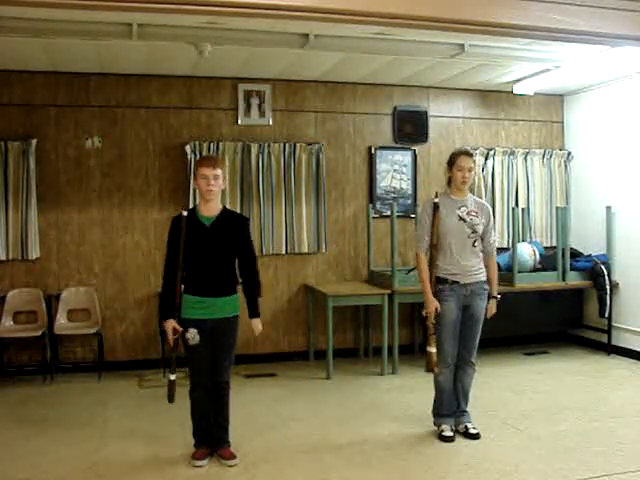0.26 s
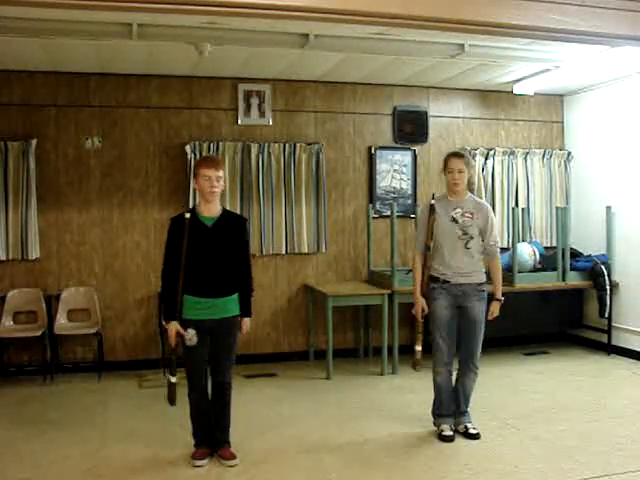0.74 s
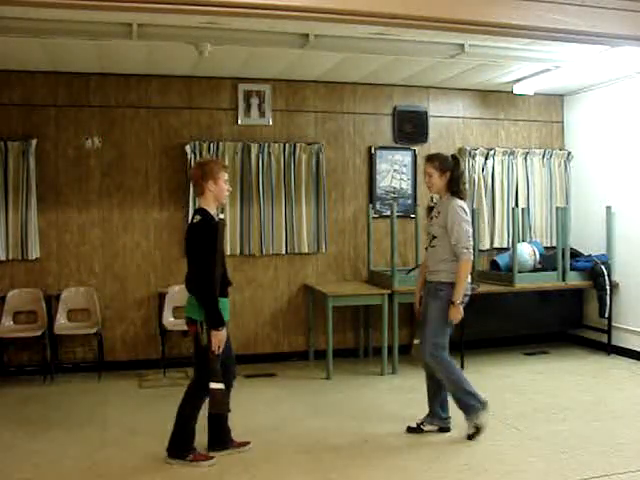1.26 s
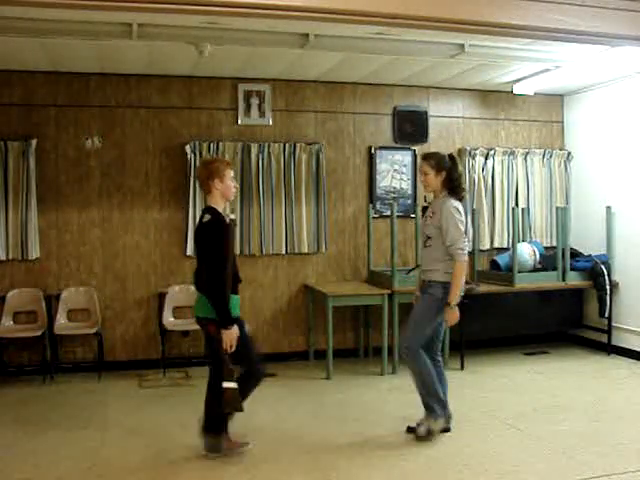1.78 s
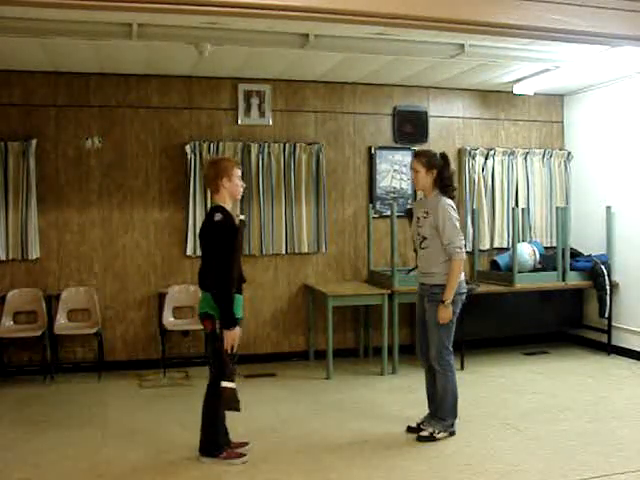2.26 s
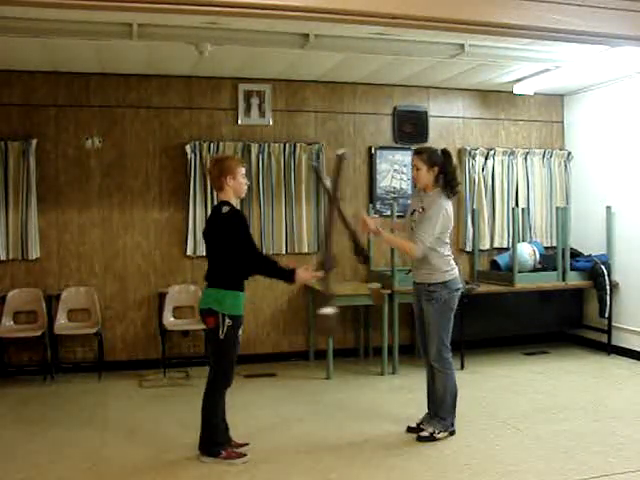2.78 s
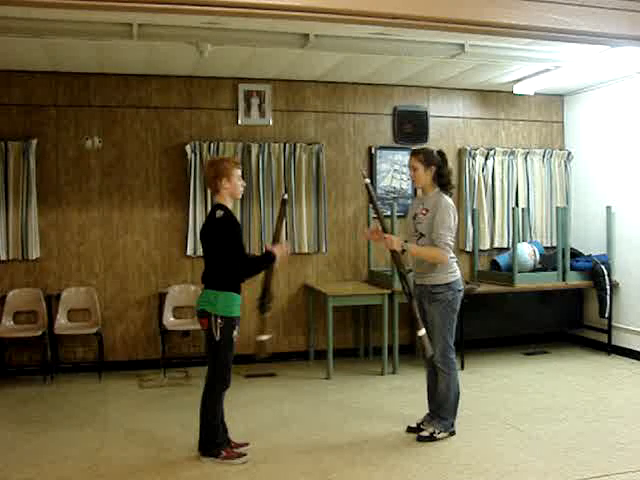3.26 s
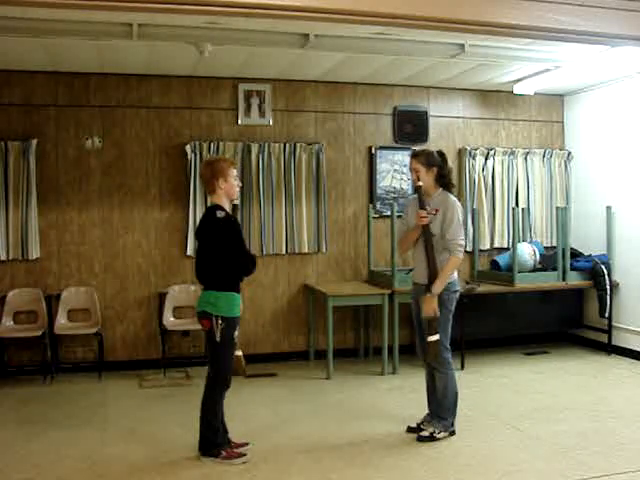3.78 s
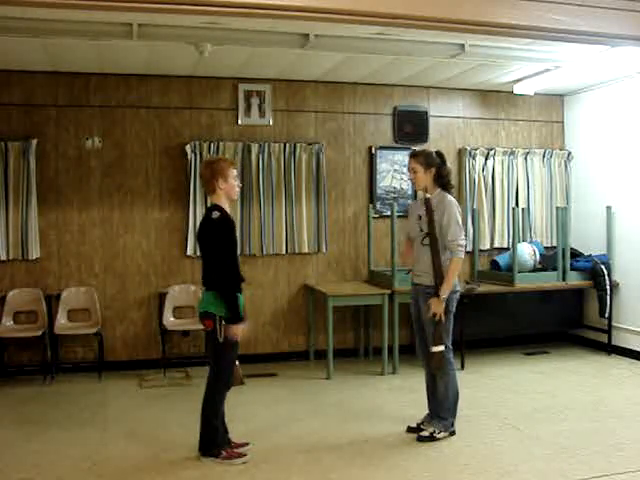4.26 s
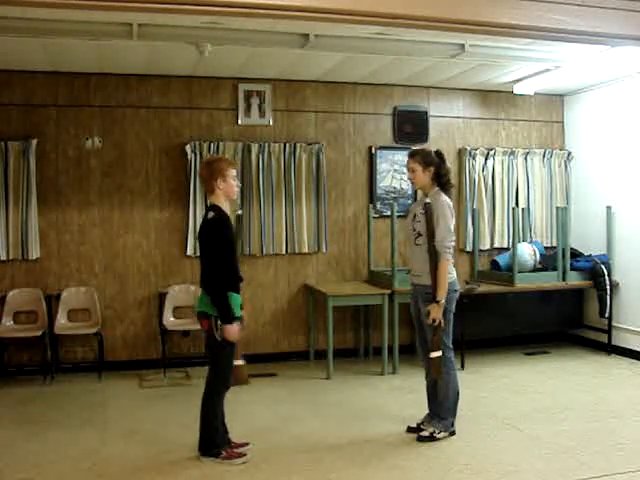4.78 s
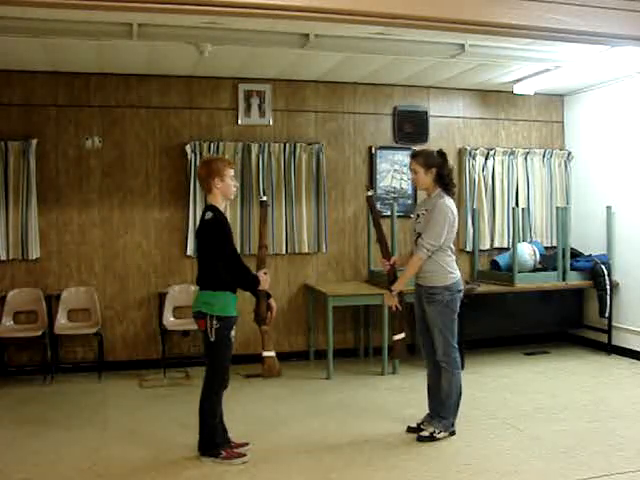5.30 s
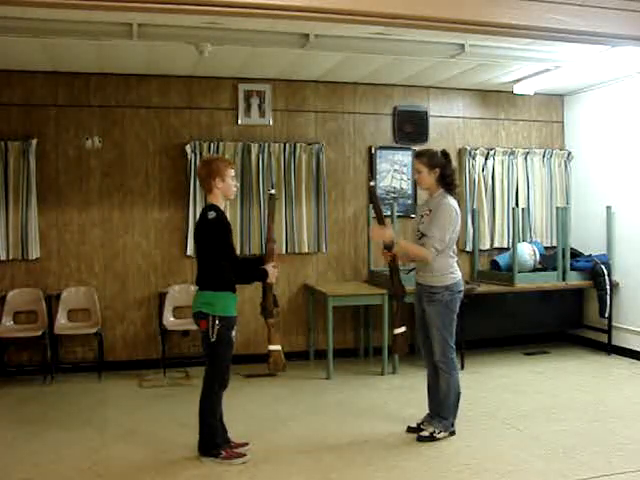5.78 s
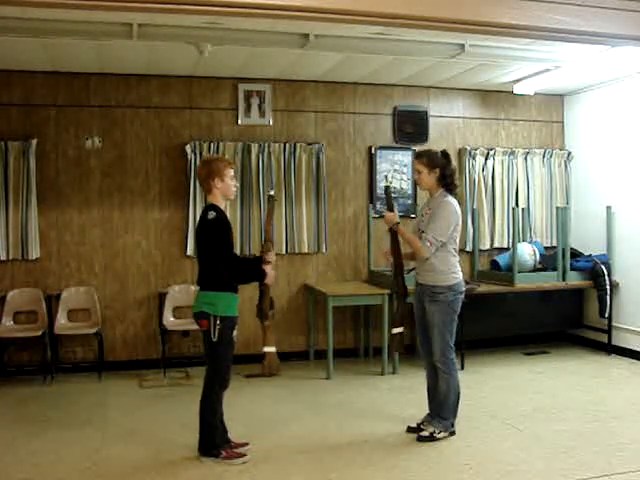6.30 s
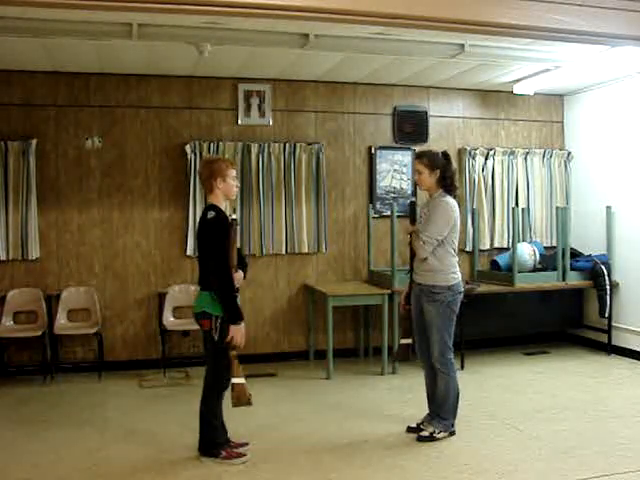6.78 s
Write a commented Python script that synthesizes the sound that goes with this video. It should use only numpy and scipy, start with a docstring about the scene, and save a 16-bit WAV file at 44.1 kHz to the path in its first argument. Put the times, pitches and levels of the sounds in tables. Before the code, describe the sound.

Echoing hall rifle drill: light taps, squeaky turn and scuff, metallic clink, loud foot stamp, then irregular bursts of crisp woody slaps with pauses.

```python
"""A panelled hall with a hard floor, where two people drill with wooden-stocked rifles.
Hands slap the stocks: coloured clicks, wood modes and cupped-air pops. Steel fittings tick and ring.
Soles squeak as wavering tones, scuff as grainy noise and stamp with a thud, floor modes and a boom.
The blows reach the microphone with a reverberant tail of most of a second, over steady room noise.
A small camera's gain control flattens the loudest blows and leaks a soft thump."""
import sys
import numpy as np
from scipy import signal
from scipy.fft import rfft, irfft
from scipy.io import wavfile

SR = 44100
rng = np.random.default_rng(int(sys.argv[2]) if len(sys.argv) > 2 else 0)


def materialize(psi):
    """Save the field psi as 16-bit PCM at rate SR to the path in sys.argv[1].

    A 1-D psi becomes a single channel; in a 2-D psi each row is a channel.
    """
    bounded = np.clip(np.atleast_2d(psi).T, -1, 1)
    quanta = np.round(bounded * 32767).astype(np.int16)
    wavfile.write(sys.argv[1], SR, quanta)


N = 310464

# hands on the rifles: start_s, level_db, pop_db (re crack), treble_db, knock_hz (where the hand lands)
SLAPS = [(0.003, -7.5, -1, -12, 3200), (0.045, -5.5, 0, -23, 1450), (0.241, 2.5, -1, -18.5, 1610),
         (0.363, -12, -10, 7, 3700), (0.851, -9, 2, -16, 1290), (1.3, -4.5, 2, 25, 1320),
         (2.497, -5.5, -6, -14, 2540), (2.716, 3.5, -8, -11, 1600), (2.929, 14, -21, -1.5, 2900),
         (3.022, 17, -3.5, 2.5, 3010), (3.389, 6.5, -12, -6.5, 2450), (3.495, 9, -5.5, -1, 2160),
         (3.779, -3.5, 12, -24, 1330), (3.812, 4, 4, -5.5, 2700), (4.168, -5.5, 2.5, -3, 2820),
         (4.366, -1, -1, -19.5, 1660), (4.848, -6, -8, -5, 3080), (5.08, 20.5, -15, 0, 1840),
         (5.191, 5, -7, -28, 1790), (5.87, 17, -7, 4.5, 1800), (5.954, 10.5, -12, -6, 2530),
         (6.422, -8, -5, -10, 1770), (6.516, -10.5, -0.5, 15, 2280), (6.638, 17.5, -2.5, 8, 3250),
         (6.692, 15, -10, -14.5, 2310)]
# colour of palm on wood: freq_hz, density_db
CRACK_COLOUR = [(60, -43.5), (150, -30.5), (300, -15.5), (480, -9), (650, -5), (850, 1.5), (1300, 3),
                (1800, 3.5), (2400, 4.5), (3300, 4), (4400, 1.5), (5600, -7), (8000, -9), (10000, -18.5)]
# what the rifles ring with: pitch_hz, level_db, t60_s
STOCK_MODES = [(464, 5.5, 0.043), (1390, -9, 0.043), (1665, 9, 0.21), (2340, -2.5, 0.062), (2770, 5, 0.16),
               (3050, -18.5, 0.24), (3640, -3, 0.079)]
STOCK_DB = -16.5                       # re crack
KNOCK_DB, KNOCK_CYCLES = -7.5, 28      # knock of the wood under the hand: re crack, periods to die by 60 dB
FINGERS_LEAD_S, FINGERS_DB = .002, -15   # the fingers touch just before the palm; level re crack
# rattle time after a 0 dB slap; a harder slap grips the rifle sooner (dB of time per dB)
RATTLE_S, RATTLE_SHORTENS = 0.011, 0.13
# air cupped under a palm: pitch, its fall per dB of pop, time the hand takes to close, periods to die
HOLLOW_HZ, HOLLOW_FALL_HZ_PER_DB, GRIP_S, HOLLOW_CYCLES = 850.5, 3, .009, 32
UNEVEN_DB = 1.8                        # chance peaks in the colour of each blow


def rifle_slaps():
    """A palm cracks on the stock, the rifle knocks, rings and rattles, and the air under the closing hand pops."""
    out = np.zeros(N)
    no_bass = signal.butter(2, 480, "high", fs=SR, output="sos")   # a slim stock radiates little bass
    for start_s, level_db, pop_db, treble_db, knock_hz in SLAPS:
        strength = from_db(level_db)
        rattle_s = RATTLE_S * from_db(-RATTLE_SHORTENS * level_db)
        crack = pulse(CRACK_COLOUR, treble_db=treble_db, uneven_db=UNEVEN_DB)
        knock = from_db(KNOCK_DB) * cavity(knock_hz, KNOCK_CYCLES)
        wood = knock + from_db(STOCK_DB) * ring(STOCK_MODES, detune=0.00075)
        pop = cavity(HOLLOW_HZ - HOLLOW_FALL_HZ_PER_DB * pop_db, HOLLOW_CYCLES)
        add(out, start_s - FINGERS_LEAD_S, strength * from_db(FINGERS_DB) * contact(crack, RATTLE_S))
        add(out, start_s, strength * contact(crack, rattle_s))
        add(out, start_s, strength * contact(signal.sosfilt(no_bass, wood), rattle_s))
        pop_in_hall = contact(signal.sosfilt(no_bass, pop), rattle_s)
        add(out, start_s + GRIP_S, strength * from_db(pop_db) * pop_in_hall)
    return out


# small metal parts: start_s, level_db, ring_db (re tick)
CLINKS = [(1.73, 14.5, -2.5), (1.773, -8, -16), (2.385, -4.5, -20), (2.494, -3.5, -16), (2.763, 0, -18),
          (4.02, -4, -28)]
# colour of a steel tick: freq_hz, density_db
TICK_COLOUR = [(100, -50), (600, -39), (1400, -4.5), (2300, 0.5), (4200, 2.5), (5500, -3), (8000, -4),
               (10000, -10.5)]
# what the fittings ring with: pitch_hz, level_db, t60_s
METAL_MODES = [(3910, -3, .05), (4156, 0, 0.064), (3880, -17, .06), (4540, -0.5, 0.034), (6400, -18, .2),
               (8540, -25, .08)]
CLINK_TREBLE_DB, CLINK_RATTLE_S = -1, 0.0088


def fittings():
    """Small steel parts chatter and ring high."""
    out = np.zeros(N)
    for start_s, level_db, ring_db in CLINKS:
        tick = pulse(TICK_COLOUR, treble_db=CLINK_TREBLE_DB, uneven_db=UNEVEN_DB)
        metal = ring(METAL_MODES, detune=0.00076)
        add(out, start_s, from_db(level_db) * contact(tick, CLINK_RATTLE_S))
        add(out, start_s, from_db(level_db + ring_db) * contact(metal, CLINK_RATTLE_S))
    return out


# feet on the floor: start_s, level_db, thud_db, treble_db, scrape_s
STEPS = [(0.617, -5, -14, 1, 0.0011), (0.66, -15.5, 24, -20, 0.011), (0.741, -6.5, -4, 3.5, 0.013),
         (1.23, -5, 5, 7, 0.0098), (1.41, 5.5, 6.5, -2, 0.03), (1.611, -6, -5, 16, 0.002),
         (1.898, 24, -7.5, -2.5, 0.0092), (1.921, 15.5, -3, -10, 0.002), (1.966, 14, -7.5, -17, 0.0035)]
# colour of a sole on the floor: freq_hz, density_db
STAMP_COLOUR = [(25, -30), (55, -15), (110, -4), (250, -1.5), (350, -1.5), (490, 0.5), (750, -3.5),
                (1300, -6), (2200, -4), (3400, -3), (4600, -10), (6000, -18.5), (10000, -31.5)]
# what the floor rings with under a heel: pitch_hz, level_db, t60_s
FLOOR_MODES = [(240, 1, .3), (265.5, 1.5, 0.17), (464.4, 2.5, .25), (511.6, -5, .25)]
# colour of the boom under a foot: freq_hz, density_db
BOOM_COLOUR = [(25, -10), (50, 3.5), (80, -18), (160, -12), (1000, -65)]
FLOOR_DB, BOOM_DB, BOOM_T60_S = -12, -21.5, 0.62   # both levels re the weight of the step


def footwork():
    """A sole lands with a thud and grinds briefly; the floor rings and booms on under it."""
    out = np.zeros(N)
    dying = from_db(-60 * np.arange(SR) / SR / BOOM_T60_S)
    for start_s, level_db, thud_db, treble_db, scrape_s in STEPS:
        stamp = pulse(STAMP_COLOUR, thud_db, treble_db, uneven_db=UNEVEN_DB)
        add(out, start_s, from_db(level_db) * contact(stamp, scrape_s, direct_db=-23))
        weight = from_db(level_db + thud_db / 2)
        rumble = dying * rng.standard_normal(SR)
        boom = unit_energy(signal.fftconvolve(rumble, pulse(BOOM_COLOUR)))
        add(out, start_s, weight * from_db(BOOM_DB) * boom)
        floor = contact(ring(FLOOR_MODES, detune=0), scrape_s)
        add(out, start_s, weight * from_db(FLOOR_DB) * floor)
    return out


# rubber soles twisting on the floor: start_s, length_s, pitch_hz (at the start), level_db,
# overtone_db (re fundamental), tremble_share (of pitch)
SQUEAKS = [(0.954, 0.11, 3612, -18.5, -16.5, 0.0081), (0.956, 0.015, 2940, -25.5, -33, 0.011),
           (1.02, 0.03, 2870, -22.5, -1, 0.041), (1.071, 0.051, 2600, -22, -9, .04)]


def squeaking_soles():
    """The squeaks of the turn, ringing on in the hall."""
    out = np.zeros(N)
    for start_s, length_s, pitch_hz, level_db, overtone_db, tremble_share in SQUEAKS:
        add(out, start_s, from_db(level_db) * squeak(length_s, pitch_hz, overtone_db, tremble_share))
    return signal.fftconvolve(out, hall(build_s=0.00098, direct_db=1.5))[:N]


# the pitch sags by this share as the twist slows, fast at first; it also hops by a random share
SAG_SHARE, SAG_S, SQUEAK_HOP_SHARE = 0.27, .085, .024
# the grip of the rubber comes and goes
SQUEAK_ATTACK_S, SQUEAK_RELEASE_S, SQUEAK_FLUTTER_DB = 0.013, 0.01, 3.5


def squeak(length_s, pitch_hz, overtone_db, tremble_share, grit_db=-19, third_db=-13):
    """Rubber sticks and slips unevenly over a gritty rub; the pitch falls as the turn slows."""
    level = envelope(length_s, SQUEAK_ATTACK_S, SQUEAK_RELEASE_S)
    size = len(level)
    sagging_hz = pitch_hz * (1 - SAG_SHARE * (1 - np.exp(-np.arange(size) / SR / SAG_S)))
    waver = smooth(rng.standard_normal(size), .0008)
    tremble = tremble_share * waver / waver.std()
    bend = 1 + tremble + SQUEAK_HOP_SHARE * wander(size, SR // 150)
    phase = 2 * np.pi * np.cumsum(sagging_hz * bend) / SR
    overtones = np.sin(2 * phase) + from_db(third_db) * np.sin(3 * phase)
    slips = np.sin(phase) + from_db(overtone_db) * overtones
    rub = signal.fftconvolve(rng.standard_normal(size), pulse(TICK_COLOUR))[:size]
    flutter = from_db(SQUEAK_FLUTTER_DB * wander(size, SR // 120))
    return (slips + from_db(grit_db) * rub) * level * flutter


# soles sliding through the turn and the leg lift: start_s, length_s, level_db, treble_db
SCUFFS = [(0.912, 0.21, -34.5, 11.5), (1.047, 0.39, -39.5, -2.5), (1.372, 0.047, -30, 76),
          (1.557, 0.097, -37, -13)]
SCUFF_ATTACK_S, SCUFF_RELEASE_S, SCUFF_GRAIN_DB, SCUFF_BASS_DB = 0.013, 0.031, 4, -11


def scuffs():
    """A sliding sole makes a grainy rub that fills the hall."""
    out = np.zeros(N)
    for start_s, length_s, level_db, treble_db in SCUFFS:
        level = envelope(length_s, SCUFF_ATTACK_S, SCUFF_RELEASE_S)
        grain = from_db(SCUFF_GRAIN_DB * wander(len(level), SR // 200))
        rub = level * grain * rng.standard_normal(len(level))
        coloured_rub = signal.fftconvolve(rub, pulse(STAMP_COLOUR, SCUFF_BASS_DB, treble_db))
        add(out, start_s, from_db(level_db) * coloured_rub)
    return signal.fftconvolve(out, hall(build_s=0.0063, direct_db=-2))[:N]


TAPS_PER_S, TAP_DB, TAP_SPREAD_DB = 4, -19, 3
TAP_CRACK_DB = -9   # re the hollow part of the tap


def finger_taps():
    """Faint hollow taps come at random as fingers shift on the stocks."""
    strengths = from_db(TAP_DB + TAP_SPREAD_DB * rng.standard_normal(N))
    taps = (rng.random(N) < TAPS_PER_S / SR) * strengths
    hollow = contact(cavity(HOLLOW_HZ, HOLLOW_CYCLES), RATTLE_S)[:SR]
    crack = contact(pulse(CRACK_COLOUR), RATTLE_S)[:SR]
    return signal.fftconvolve(taps, hollow + from_db(TAP_CRACK_DB) * crack)[:N]


# colour of the steady room noise: freq_hz, density_db
ROOM_COLOUR = [(25, 2), (60, -4), (130, -8.5), (300, 0), (500, 3), (680, 1.5), (850, 11.5), (1050, 5),
               (1800, 1), (3200, -7), (5000, -7), (10000, -15)]
ROOM_TONE_DB = -49.5   # RMS re full scale
HUM_HZ, HUM_DB = 120, -75   # level likewise


def room_tone():
    """Steady air noise with a hollow colour, and a faint mains hum."""
    air = signal.fftconvolve(rng.standard_normal(N), pulse(ROOM_COLOUR))[:N]
    hum = np.sqrt(2) * np.sin(2 * np.pi * HUM_HZ * np.arange(N) / SR)
    return from_db(ROOM_TONE_DB) * air + from_db(HUM_DB) * hum


# decay of the hall: freq_hz, t60_s
HALL_T60 = [(100, 0.15), (400, 0.51), (1000, 0.9), (2500, 0.92), (4500, 0.72), (8000, 0.63)]
FLUTTER_DB = 1.2   # lumpiness of the tail


def hall(build_s, direct_db, early_db=-8, early_s=0.016, echoes_per_s=1500):
    """Response from one spot: direct sound, sparse near reflections, a lumpy diffuse tail dying band by band."""
    t = np.arange(SR) / SR
    hz = np.fft.rfftfreq(SR, 1 / SR)
    white = rfft(rng.standard_normal(SR))
    centres, t60s = np.transpose(HALL_T60)
    tail = 0
    for t60, share in zip(t60s, np.eye(len(t60s))):   # overlapping bands that sum to one
        band = irfft(white * np.interp(hz, centres, share))
        tail = tail + band * np.exp(-np.log(1000) * t / t60)
    tail = tail * from_db(FLUTTER_DB * wander(SR, SR // 150))
    echoes = rng.choice([-1, 1], SR) * (rng.random(SR) < echoes_per_s / SR)
    early = echoes * np.exp(-t / early_s)
    swelling_tail = unit_energy(tail * (1 - np.exp(-t / build_s)))
    response = swelling_tail + from_db(early_db) * unit_energy(early)
    response[0] += from_db(direct_db)
    return response


def contact(sound, spread_s, direct_db=-15, firm_s=0.0052):
    """A blow in the hall: the longer it rattles or scrapes, the softer its edge and the slower the tail swells."""
    edge_db = -10 * np.log10(1 + (spread_s / firm_s) ** 2)
    return signal.fftconvolve(sound, hall(spread_s, direct_db + edge_db, early_db=1.5 + edge_db))


def pulse(colour, bass_db=0, treble_db=0, bass_hz=450, treble_hz=3000, uneven_db=0, size=2048):
    """Minimum-phase click with this colour, two shelves and chance peaks from where the blow lands; energy 1."""
    hz = np.fft.rfftfreq(size, 1 / SR)
    bass_shelf = bass_db / (1 + (hz / bass_hz) ** 2)
    treble_shelf = treble_db * hz ** 2 / (hz ** 2 + treble_hz ** 2)
    db = at_hz(colour, hz) + bass_shelf + treble_shelf + uneven_db * wander(len(hz), 6)
    cepstrum = irfft(np.log(from_db(db)))
    cepstrum[1:size // 2] *= 2   # folding the cepstrum makes the click causal and as short as can be
    cepstrum[size // 2 + 1:] = 0
    return unit_energy(irfft(np.exp(rfft(cepstrum))))


def ring(modes, detune):
    """Decaying modes, energy 1; each blow may shift their pitches by a small random share."""
    t = np.arange(SR // 4) / SR
    hz, db, t60 = np.transpose(modes)[:, :, None]
    hz = hz * (1 + detune * rng.standard_normal(hz.shape))
    decay = np.exp(-np.log(1000) * t / t60)
    return unit_energy(np.sum(from_db(db) * decay * np.sin(2 * np.pi * hz * t), axis=0))


def cavity(hz, cycles):
    """One short resonance that dies by 60 dB in so many periods."""
    return ring([(hz, 0, cycles / hz)], detune=0)


def envelope(length_s, attack_s, release_s):
    """Half a second holding a straight rise, a hold until length_s and a dying release."""
    t = np.arange(SR // 2) / SR
    return np.minimum(t / attack_s, 1) * np.exp(-np.maximum(t - length_s, 0) / release_s)


def wander(size, step):
    """Random values of spread 1, a step apart, joined by lines."""
    knots = size // step + 2
    return np.interp(np.arange(size) / step, np.arange(knots), rng.standard_normal(knots))


def smooth(x, seconds):
    """One-pole low-pass."""
    r = np.exp(-1 / (seconds * SR))
    return signal.lfilter([1 - r], [1, -r], x)


def from_db(db):
    """Amplitude ratio of a level in dB."""
    return 10 ** (np.asarray(db) / 20)


def unit_energy(x):
    """Scale to a sum of squares of 1."""
    return x / np.sqrt(np.sum(x ** 2) + 1e-20)


def at_hz(points, hz):
    """Read a table on a log-frequency axis."""
    table_hz, values = np.transpose(points)
    return np.interp(np.log(hz + 1), np.log(table_hz), values)


def add(out, start_s, sound):
    """Mix a sound in at a time."""
    start = max(0, round(start_s * SR))
    out[start:start + len(sound)] += sound[:N - start]


def scene():
    """Rifles, feet and squeaking soles in the hall, over its steady noise."""
    rifles = rifle_slaps() + fittings() + finger_taps()
    feet = footwork() + squeaking_soles() + scuffs()
    return (rifles + feet + room_tone())[None]


ATTACK_S, LOOK_AHEAD_S = .001, .003
THUMP_PER_DB, THUMP_S = .0035, .035   # thump height per dB of turn, and its decay
KICK_SIZE, KICK_S = 3.5, .0015        # it first kicks the other way: times as far, and its decay


def gain_control(x, ceiling_db=-19.5, sense_s=0.001, release_db_per_s=50):
    """Loud, bright sound turns the gain down at once and it creeps back; each sudden turn leaks a soft thump."""
    bright = signal.lfilter([1, -.9], [1], x)
    sensed_db = 10 * np.log10(smooth(bright ** 2, sense_s) + 1e-12)
    over_db = np.maximum(sensed_db - ceiling_db, 0)
    creep_db = release_db_per_s * np.arange(N) / SR
    held_db = np.maximum.accumulate(over_db + creep_db, axis=-1) - creep_db
    cut_db = smooth(held_db, ATTACK_S)
    turn = np.maximum(np.diff(cut_db, prepend=0), 0)
    early_cut_db = np.roll(cut_db, -round(LOOK_AHEAD_S * SR), axis=-1)
    thump = THUMP_S * smooth(turn, THUMP_S) - KICK_SIZE * KICK_S * smooth(turn, KICK_S)
    return x * from_db(-early_cut_db) + THUMP_PER_DB * SR * thump


def record(dry):
    """The camera microphone: gain control, rounded peaks and a steep cut of the top."""
    rounded = .62 * np.tanh(gain_control(dry) / .62)
    top_cut = signal.ellip(12, .2, 70, 10100, fs=SR, output="sos")   # low-pass at 10100 Hz
    return signal.sosfilt(top_cut, rounded)


dry = scene()
out = record(dry)
materialize(out)
```